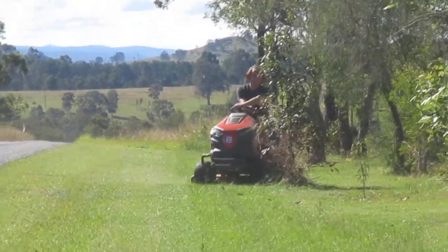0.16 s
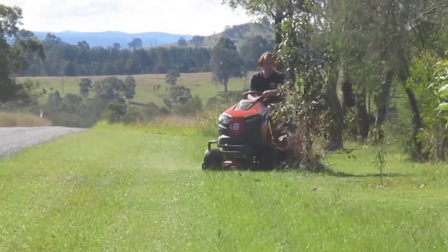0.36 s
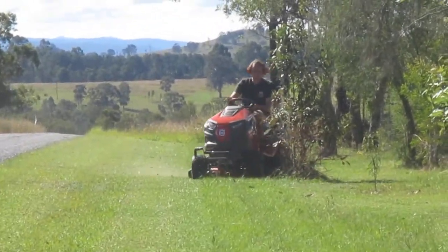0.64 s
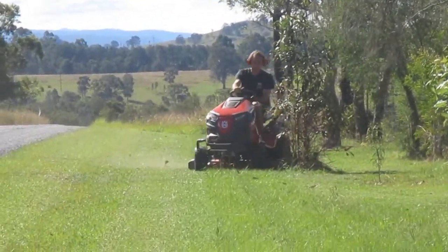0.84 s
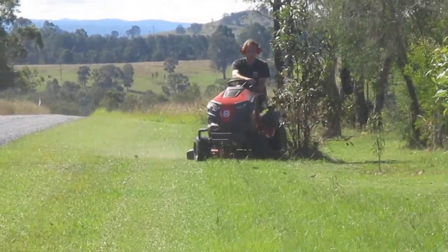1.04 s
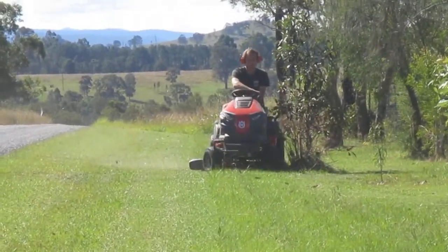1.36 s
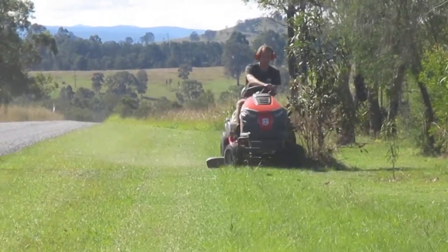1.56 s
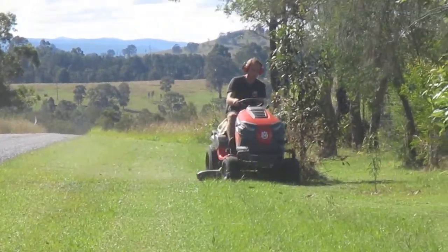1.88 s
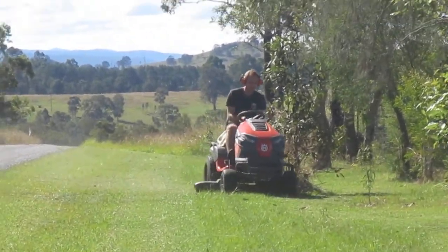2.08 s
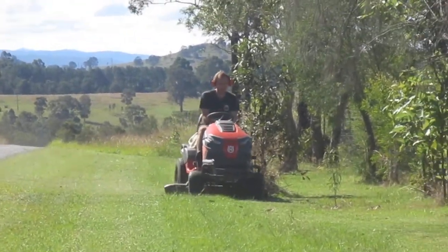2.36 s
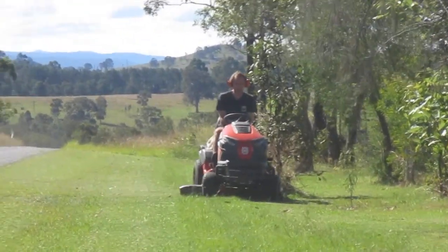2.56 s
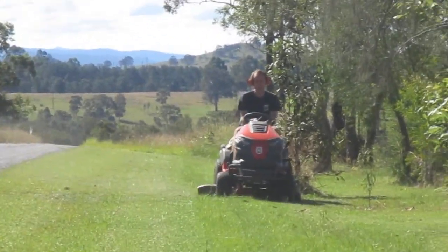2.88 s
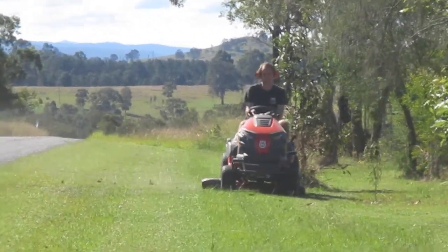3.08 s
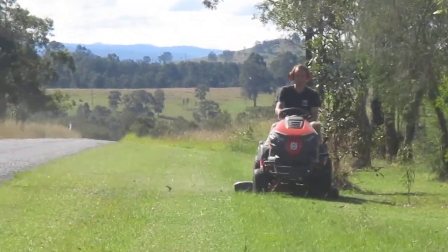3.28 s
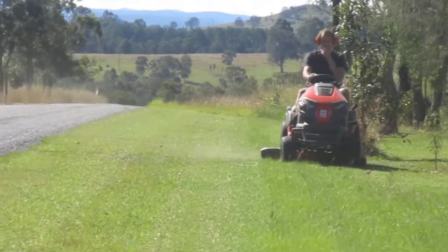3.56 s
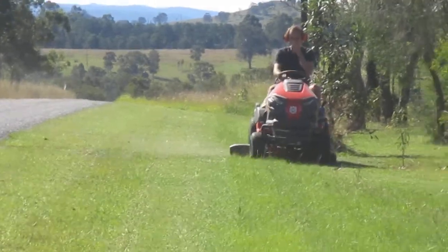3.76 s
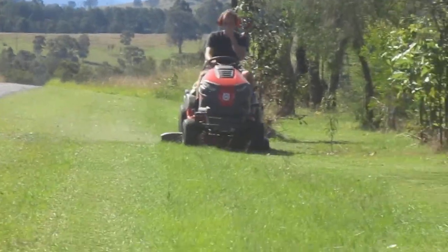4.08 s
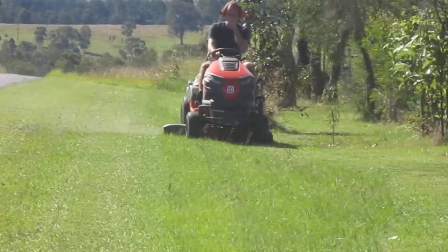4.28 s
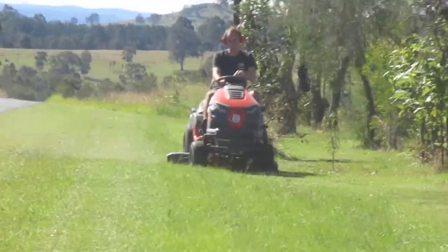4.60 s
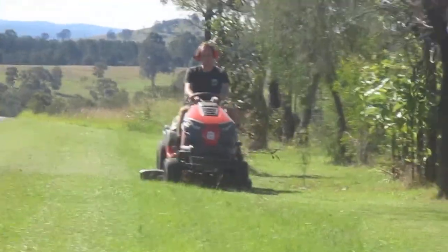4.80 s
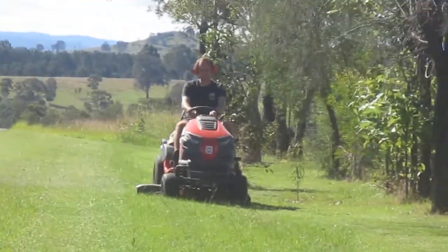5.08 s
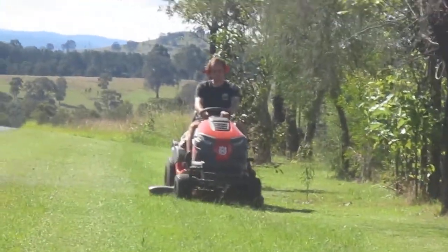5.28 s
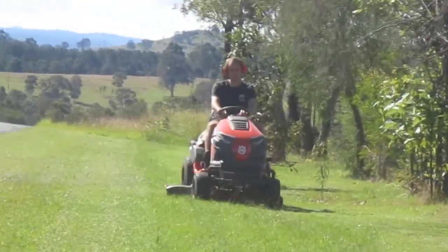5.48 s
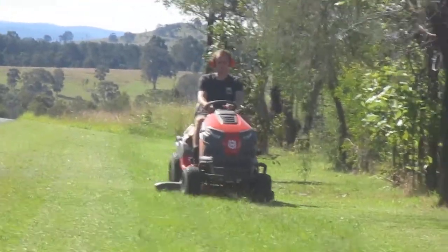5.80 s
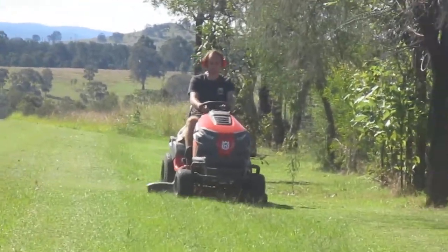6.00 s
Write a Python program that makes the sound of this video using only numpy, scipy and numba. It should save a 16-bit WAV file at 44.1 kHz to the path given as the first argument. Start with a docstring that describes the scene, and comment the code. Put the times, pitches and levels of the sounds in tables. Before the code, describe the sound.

A ride-on mower runs at constant engine speed in the open, distant and modest at first, then swelling as it turns and drives nearer. Its low, uneven buzzing drone carries a deck roar and faint cutting hiss. Wind buffets the microphone, with sharp knocks early, just before one second, and hardest near four seconds; the mower ducks after the strongest hits and swells back.

```python
"""A ride-on mower with a V-twin engine at governed speed turns and drives slowly closer across a lawn.
Its drone is a stack of tones timed by uneven gas pulses; shaped noise and wavering tones make the deck roar.
Shaped noise also makes the hiss of the cooling fan and cut grass, with singing blades and short swishes.
Gusts are low noise and knocks are short pressure swings at the microphone; the hardest knocks push
a limiter down, and the mower swells back."""
import sys
import numpy as np
from scipy import signal
from scipy.fft import rfft, irfft
from scipy.io import wavfile
from scipy.ndimage import uniform_filter1d
from numba import njit

SR = 44100
rng = np.random.default_rng(int(sys.argv[2]) if len(sys.argv) > 2 else 0)


def put_to_file(sound):
    """Save the sound as 16-bit audio at rate SR, in the file named by the first command-line argument."""
    columns = np.atleast_2d(sound).T  # one column per channel
    safe = np.clip(columns, -1, 1)
    whole_steps = np.round(safe * 32767)
    wavfile.write(sys.argv[1], SR, whole_steps.astype(np.int16))


N = 270774
TIME = np.arange(N) / SR  # seconds

# governed speed of the four-stroke engine (time [s], engine cycles per second [Hz])
ENGINE_SPEED = [(0, 26.22), (1.2, 26.16), (1.6, 26.1), (2.1, 26.15), (4.1, 26.145), (4.5, 26.32),
                (5.6, 26.17), (6.14, 26.24)]
# basic levels as the mower turns and comes closer (time [s], exhaust [dB], deck [dB], hiss [dB])
APPROACH = [(0, -26, -38.5, -54), (.75, -25, -35, -48), (1.05, -26, -37.5, -50.5), (1.7, -26, -37, -53.5),
            (2.7, -21.5, -33, -46), (3.55, -17, -30.5, -43), (4.5, -15, -25.5, -41.5), (5.1, -17, -29, -42),
            (5.7, -15.5, -25.5, -44), (6.14, -15.5, -27, -44)]
# gas pulses of one cycle: two exhaust strokes and the intake (place in the cycle [0-1], level [dB])
GAS_PULSES = [(0, -0.5), (0.371, 0), (0.718, -10)]
# tones of the engine drone, before tilt and sway (multiple of the cycle rate, relative level [dB])
DRONE_TONES = [(1, -20), (2, -11), (3, -47), (4, -0.5), (5, 1), (6, 2), (7, -8), (8, -1), (9, -4),
               (10, -0.5), (11, -9), (12, -6), (13, -24.5), (14, -15), (15, -21.5), (16, -37), (17, -24),
               (19, -17.5)]
# drone brightness as the muffler's bearing and the bounce off the lawn change (time [s], tilt [dB/octave])
DRONE_TILT = [(0, 1), (1.2, 0.8), (2.2, .5), (3.0, 0.7), (3.8, 0.2), (4.5, -1.5), (5.3, -1), (6.14, 1)]
# one narrow band of the drone is full while the mower faces the microphone, weaker to either side
BOOM_HZ, BOOM_WIDTH_HZ, ASIDE_DB = 256, 15.4, -7
FACING_S, FACING_LENGTH_S = 3.24, 1.3
FIRST_FIRING_S = .0317  # the first exhaust stroke

# air churned in the deck (frequency [Hz], relative level per Hz [dB])
DECK_SPECTRUM = [(150, -1), (300, 3), (390, -6.5), (440, -12), (510, 0.5), (620, 0), (720, -2.5), (830, -3),
                 (950, -16.5), (1100, -16.5), (1400, -14), (1650, -25.5), (2300, -31.5)]
# whine of the flywheel fan and gears (multiple of the cycle rate, level relative to the deck [dB])
FAN_GEAR_WHINE = [(48, -24.5), (54, -27)]
WHINE_SWAY_DB = 2.2
# drive-train tones whose beams sweep past as the mower turns (multiple of the cycle rate,
# level outside the beam relative to the deck [dB], added at the beam's centre [dB],
# beam centre [s], time from centre until the added dB fall to 37 % [s])
BEAMED_TONES = [(20, -13, 9, 3.44, 0.34), (22, -11.5, 10, 0.66, 0.83), (24, -21.5, 16.5, 3.73, 0.62),
                (26, -10, 6, 3.1, 1.9), (30, -15.5, 6, 1.5, 1.7)]
# tones of the whirling blades (frequency [Hz], level relative to the deck [dB])
BLADE_TONES = [(339, -18), (419, -15), (622, -14)]

# fan and grass hiss (frequency [Hz], relative level per Hz [dB])
HISS_SPECTRUM = [(900, 9), (1650, -10.5), (1900, 4.5), (2250, -4), (2480, 3.5), (3200, 0.5), (4000, -3.5),
                 (5200, -4.5), (6200, -7.5), (7800, -9.5), (9500, -15.5), (11300, -19.5), (13000, -26),
                 (15600, -33)]
# steel blades ringing as they scrape through grass (frequency [Hz], width [Hz], relative level [dB])
STEEL_MODES = [(2420, 91, 5), (2730, 160, 2), (3510, 300, 2), (4050, 90, 2.5), (4380, 110, -5),
               (5580, 210, 1.5), (5900, 140, -11), (6360, 180, -1), (7740, 280, 0.5), (8500, 200, -3),
               (9180, 250, -5), (11240, 200, -11), (12100, 200, -20)]
# how hard the blades scrape (time [s], level relative to the hiss [dB])
SCRAPE_LEVEL = [(0, -14), (1.7, -6), (2.6, -9), (3.9, -11.5), (4.5, -30), (6.14, -6.5)]
# thick tufts under the blades
# (peak time [s], time from peak to 37 % power [s], rise of the hiss before its low part is cut [dB])
THICK_TUFTS = [(1.34, .025, 5), (1.875, 0.038, 5.5), (3.63, .04, 3), (4.62, .025, 2.5), (5.59, 0.036, 4),
               (5.83, 0.016, 3)]

# wind rumble (frequency [Hz], relative level per Hz [dB])
RUMBLE_SPECTRUM = [(18, -40), (32, -9), (55, -4.5), (100, -5), (170, -10), (330, -16.5), (600, -35),
                   (1500, -85)]
# gusts (peak time [s], time from peak to 37 % power [s], level before lift and buffeting [dB])
GUST_TIMES = [(0.133, .13, -25.5), (.3, 0.064, -27.5), (0.53, 0.023, -27.5), (0.805, 0.068, -26),
              (1.46, 0.1, -33.5), (1.777, 0.032, -30), (2.033, 0.097, -30), (2.706, 0.17, -34),
              (3.598, 0.36, -36.5), (4.08, 0.11, -23), (4.697, 0.15, -26), (5.082, 0.087, -22),
              (5.525, 0.15, -25.5)]
CALM_DB = -41.5  # light breeze, before lift and buffeting
# eddies that knock on the microphone (time [s], peak before the limiter [dB], pitch [Hz])
EDDIES = [(.042, -4, 175), (.105, -10.5, 160), (.239, -8.5, 255), (0.2468, -13, 132), (.265, -8.5, 255),
          (0.338, -5, 170), (.767, -17, 90), (0.8311, 1, 130), (0.8432, -7, 108), (0.8548, 7, 204),
          (1.499, -17, 95), (1.778, -15.5, 70), (2.1, -18.5, 55), (3.954, 6, 107), (3.9629, 9, 140),
          (3.971, 4, 99), (4.172, -4, 90), (4.711, -4, 151), (4.786, 1.5, 90), (4.814, -6, 75),
          (4.825, -2.5, 165), (5.07, -19, 90)]

LIMIT_DB, ATTACK_S, RELEASE_S = -1.5, .0006, 0.51  # limiter
FULL_SCALE_KNEE = 14  # how abruptly peaks flatten at full scale (exponent; higher is harder)
TOP_HZ = 15650  # upper edge of the sound


def undb(db):
    """Turn decibels into a gain."""
    return 10 ** (np.asarray(db) / 20)


def unit(x):
    """Scale to an average strength (rms) of 1."""
    return x / np.sqrt(np.mean(x ** 2))


def curves(table):
    """Draw straight lines through the columns of a timed table, one value per sample."""
    s, *columns = np.transpose(table)
    return [np.interp(TIME, s, column) for column in columns]


def walk(rate):
    """Wander smoothly and randomly with a spread near 1, from about rate new values a second."""
    k = max(int(SR / rate), 2)
    held = np.repeat(rng.standard_normal(N // k + 1), k)
    smooth = uniform_filter1d(uniform_filter1d(held, k), k)
    return 1.46 * smooth[:N]


def colour(x, points):
    """Shape the spectrum of x by (frequency [Hz], level [dB]) points, at rms 1."""
    hz, db = np.transpose(points)
    log_hz = np.log(np.maximum(np.fft.rfftfreq(N, 1 / SR), 1))
    gain = undb(np.interp(log_hz, np.log(hz), db, left=-90, right=-90))
    return unit(irfft(rfft(x) * gain, N))


def swell(s, length):
    """Rise and fall smoothly, with a peak of 1 at time s."""
    return np.exp(-((TIME - s) / length) ** 2)


def puff(turns, place, length):
    """Start a burst at one place of each engine cycle and let it die away."""
    return np.exp(-((turns - place) % 1) / length)


def exhaust(turns, tilt_db, muffler_hz=110, muffler_q=0.35, uneven_db=0.5, flutter=.015, sway_db=1.0):
    """Uneven gas pulses and the muffler's delay set the timing of the drone's tones; its strength wavers."""
    cycle_hz = np.mean(np.array(ENGINE_SPEED)[:, 1])
    aside_db = ASIDE_DB * (1 - swell(FACING_S, FACING_LENGTH_S))
    drone = 0
    for k, db in DRONE_TONES:
        pulses = -sum(undb(size_db) * np.exp(-2j * np.pi * k * place) for place, size_db in GAS_PULSES)
        ratio = k * cycle_hz / muffler_hz
        muffler = 1 / (1 + 1j * muffler_q * (ratio - 1 / ratio))
        # scatter in the burn smears the high tones most
        scatter = flutter * ratio * walk(25)
        phase = 2 * np.pi * k * turns + np.angle(pulses * muffler) + scatter
        boom = np.exp(-((k * cycle_hz - BOOM_HZ) / BOOM_WIDTH_HZ) ** 2)
        level_db = db + boom * aside_db + tilt_db * np.log2(k / 6) + sway_db * walk(3.134)
        drone = drone + undb(level_db) * np.cos(phase)
    return unit(drone * undb(uneven_db * walk(52)))


def deck(turns, rap=0.15, surge_db=0.76, roar_db=1.07, waver=0.094):
    """Blade turbulence roars in the steel deck, roughened by each gas pulse; tones waver on top."""
    gate = 1 + rap * sum(puff(turns, place, length=0.1) for place, _ in GAS_PULSES)
    churn = rng.standard_normal(N) * gate * undb(surge_db * walk(14))
    roar = undb(roar_db) * colour(churn, DECK_SPECTRUM)

    tones = list(FAN_GEAR_WHINE)
    for k, db, beam_db, s, length in BEAMED_TONES:
        tones.append((k, db + beam_db * swell(s, length)))
    whine = 0
    for k, db in tones:
        phase = 2 * np.pi * k * turns + waver * walk(6.9)
        whine = whine + undb(db + WHINE_SWAY_DB * walk(3.23)) * np.sin(phase)

    # the belt slips a little, so all blade tones drift together
    blade_time = TIME + np.cumsum(0.0027 * walk(4.08)) / SR
    blades = 0
    for hz, db in BLADE_TONES:
        blades = blades + undb(db + 1.9 * walk(2.52)) * np.sin(2 * np.pi * hz * blade_time)
    return roar + whine + blades


def hiss(turns, tappet=0.42, chop=0.071, stems_per_s=900, stem_size=1.65, flicker_db=0.35):
    """Fan air throbs faintly with the engine, a tappet ticks each cycle, and grass stems snap on the blades."""
    tick = tappet * puff(turns, place=0.55, length=0.073)
    throb = chop * np.sin(2 * np.pi * turns * len(GAS_PULSES))
    air = rng.standard_normal(N) * (1 + tick + throb)
    stems = (rng.random(N) < stems_per_s / SR) * rng.standard_normal(N) * stem_size
    return colour((air + stems) * undb(flicker_db * walk(15)), HISS_SPECTRUM)


def blade_ring(tuft_db=1.5):
    """Grass rubs the blades unevenly, and their natural tones (modes) sing thinly in the hiss."""
    scrape_db, = curves(SCRAPE_LEVEL)
    f = np.fft.rfftfreq(N, 1 / SR)
    modes = sum(undb(db) / (1 + ((f - hz) / width_hz * 2) ** 2) for hz, width_hz, db in STEEL_MODES)
    rub = rng.standard_normal(N) * undb(tuft_db * walk(7.8))
    return unit(irfft(rfft(rub) * modes, N)) * undb(scrape_db)


def wind(lift_db=2.0, buffet_db=4.5):
    """Air swirls at the microphone port: gusts rise out of a light breeze and buffet unevenly."""
    gusts = sum(undb(db) ** 2 * swell(s, length) for s, length, db in GUST_TIMES)
    power = undb(CALM_DB) ** 2 + gusts
    rumble = colour(rng.standard_normal(N), RUMBLE_SPECTRUM)
    return rumble * np.sqrt(power) * undb(lift_db + buffet_db * walk(18))


def knocks(cycles=0.41):
    """Each eddy is one pressure swing with a smaller rebound on either side."""
    total = 0
    for s, db, hz in EDDIES:
        swing = swell(s, cycles / hz) * np.cos(2 * np.pi * hz * (TIME - s))
        total = total + undb(db) * swing
    return total


def swishes(corner_hz=4500):
    """A thick tuft adds a short, bright rush of shredded grass."""
    power = sum((undb(db) ** 2 - 1) * swell(s, length) for s, length, db in THICK_TUFTS)
    shred = colour(rng.standard_normal(N), HISS_SPECTRUM)
    high_pass = signal.butter(2, corner_hz, "high", fs=SR, output="sos")
    return np.sqrt(power) * signal.sosfilt(high_pass, shred)


@njit
def follow(excess, attack, release):
    """Chase a level quickly upwards and let go of it slowly."""
    out, held = np.empty(len(excess)), 0.
    for i in range(len(excess)):
        held += (excess[i] - held) * (attack if excess[i] > held else release)
        out[i] = held
    return out


def limiter(x):
    """Push the gain down towards the dB by which a peak exceeds the limit, then let it creep back."""
    excess_db = np.maximum(20 * np.log10(np.abs(x) + 1e-9) - LIMIT_DB, 0)
    cut_db = follow(excess_db, 1 / (ATTACK_S * SR), 1 / (RELEASE_S * SR))
    return x * undb(-cut_db)


def scene():
    """Add the mower in the open to the wind at the microphone."""
    cycle_hz, = curves(ENGINE_SPEED)
    # engine cycles completed, counted from the first exhaust stroke
    turns = np.cumsum(cycle_hz) / SR - FIRST_FIRING_S * cycle_hz[0]
    exhaust_db, deck_db, hiss_db = curves(APPROACH)
    tilt_db, = curves(DRONE_TILT)
    drone = exhaust(turns, tilt_db) * undb(exhaust_db)
    roar = deck(turns) * undb(deck_db)
    cutting = (hiss(turns) + blade_ring() + swishes()) * undb(hiss_db)
    return (drone + roar + cutting + wind() + knocks())[None]


def record(dry):
    """Limit the level, fade both ends softly, round off peaks at full scale and cut the top."""
    fade = np.clip(np.minimum(TIME, TIME[-1] - TIME) / .004, 0, 1)  # 4 ms at each end
    limited = limiter(dry[0]) * fade
    rounded = limited / (1 + np.abs(limited) ** FULL_SCALE_KNEE) ** (1 / FULL_SCALE_KNEE)
    low_pass = signal.ellip(8, .05, 60, TOP_HZ, fs=SR, output="sos")
    return signal.sosfiltfilt(low_pass, rounded)[None]


dry = scene()
out = record(dry)
put_to_file(out)
```